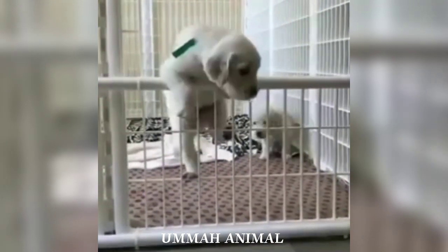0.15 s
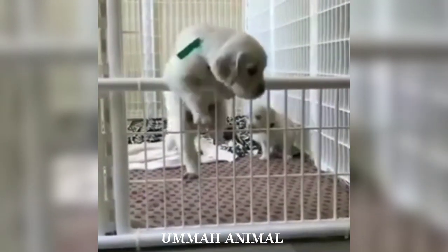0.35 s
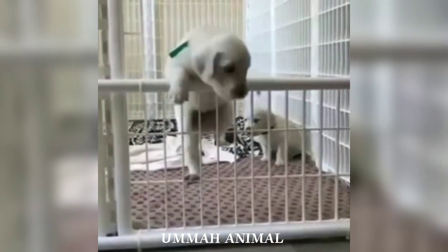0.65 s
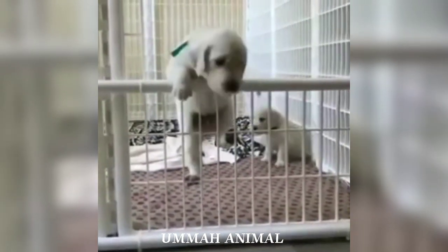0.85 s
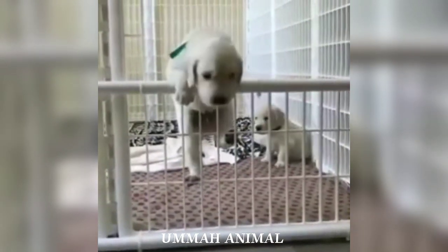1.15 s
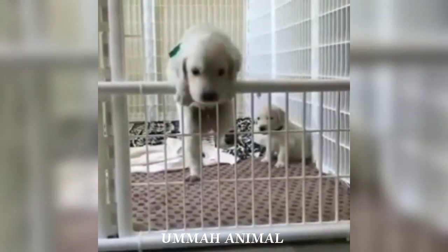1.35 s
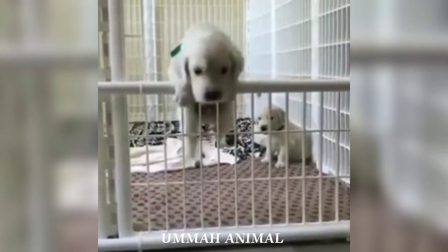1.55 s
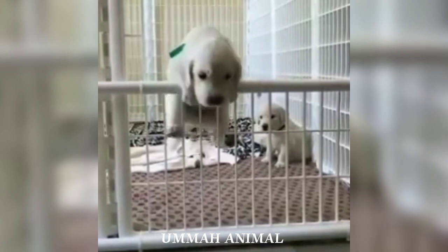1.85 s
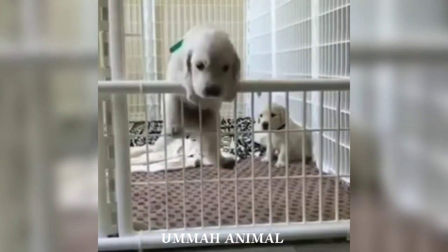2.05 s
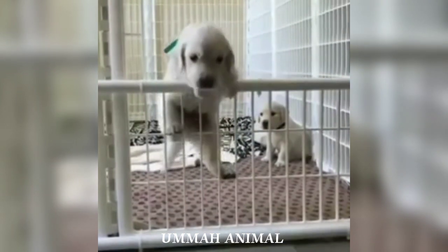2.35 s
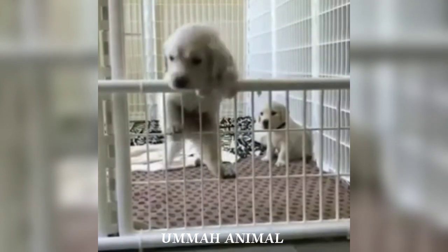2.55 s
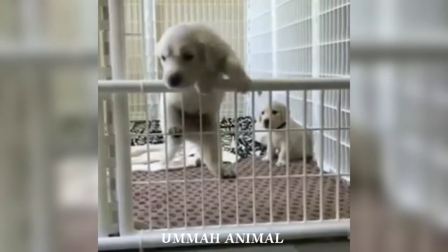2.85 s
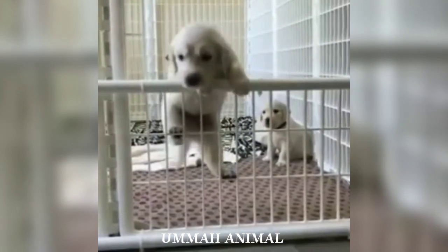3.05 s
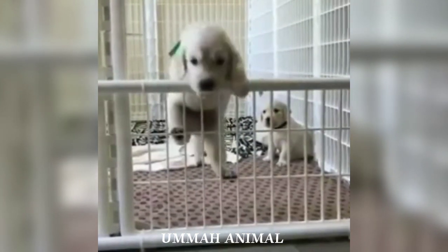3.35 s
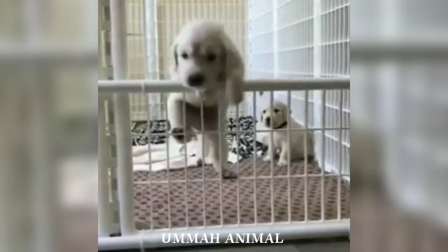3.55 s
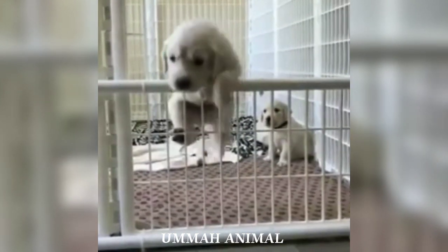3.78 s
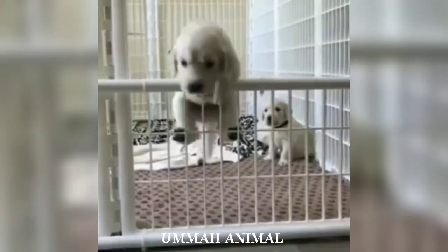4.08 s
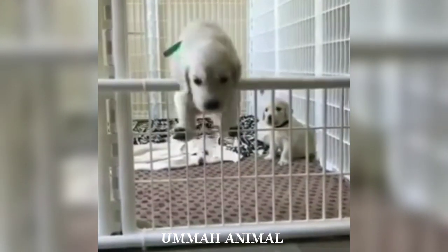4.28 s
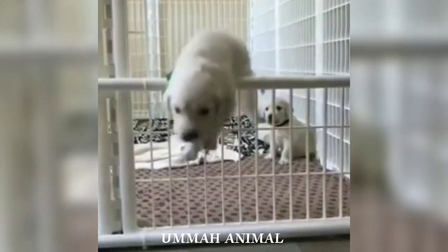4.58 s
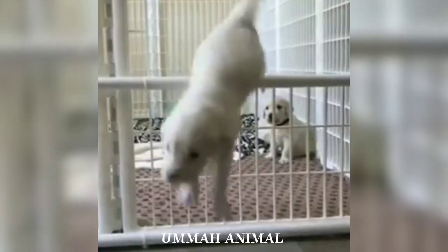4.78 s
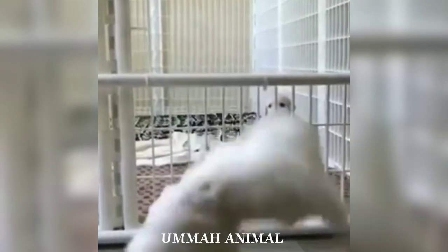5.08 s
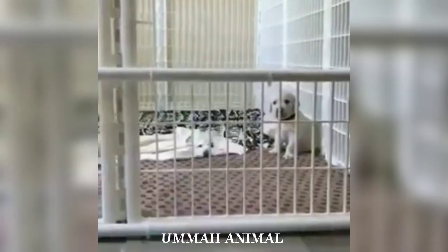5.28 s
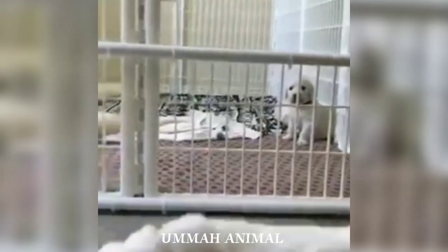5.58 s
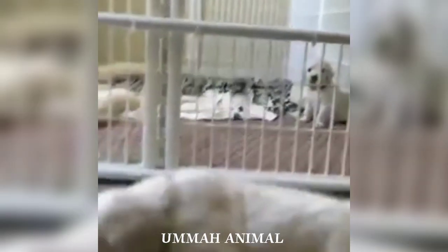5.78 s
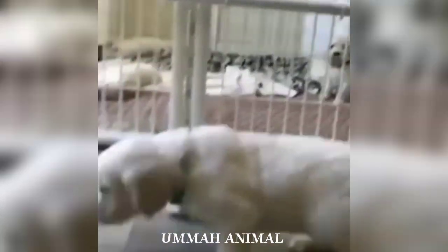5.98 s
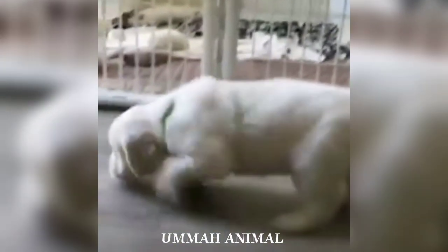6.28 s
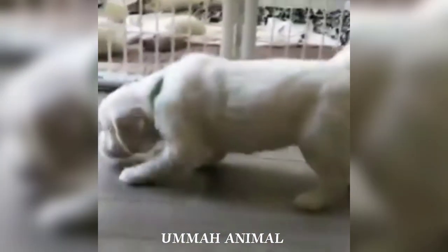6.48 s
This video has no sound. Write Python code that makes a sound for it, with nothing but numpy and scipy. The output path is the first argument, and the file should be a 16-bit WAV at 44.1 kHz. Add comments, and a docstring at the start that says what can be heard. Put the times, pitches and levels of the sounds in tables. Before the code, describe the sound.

A puppy whines in a string of short, high cries, its claws ticking on wire, then lands with one loud knock and scuffs away.

```python
"""A puppy whines over the rail of a wire pen in a small room. Its vocal folds sing short, nearly pure
arches of pitch, and air through its nose adds a hiss and a very high whistle around each one.
Its claws tick on the wire, it drops to the floor with one loud knock among softer bumps, and it
scuffs away on its paws. A low hum and faint room noise lie underneath."""
import sys
import numpy as np
from scipy import signal
from scipy.fft import rfft, irfft
from scipy.io import wavfile
from scipy.ndimage import uniform_filter1d

SR = 44100
rng = np.random.default_rng(int(sys.argv[2]) if len(sys.argv) > 2 else 0)


def waveform_to_disk(signal):
    """Save audio, clipped to [-1, 1], as 16-bit WAV at the path in sys.argv[1]."""
    frames = np.transpose(np.atleast_2d(signal))
    scaled = np.clip(frames, -1, 1) * 32767
    samples = np.round(scaled).astype(np.int16)
    wavfile.write(sys.argv[1], SR, samples)


N = 292383
T = np.arange(N) / SR

# the tones of the hum (frequency [Hz], level [dB])
HUM_TONES = [(49.2, -61), (98.4, -74.5), (120, -70.5)]
# the tone colour of the room noise (frequency [Hz], gain [dB])
ROOM_NOISE_COLOUR = [(15, -22), (25, -15), (54, 0), (80, -25.5), (122, -8.5), (151, -19.5), (208, -17.5),
                     (372, -26.5), (498, -28.5), (966, -31.5), (1360, -31), (1780, -37), (2780, -41),
                     (14000, -48.5)]
# blows of the body on rail and floor
# (time [s], level [dB], base pitch [Hz], swell time [s], crack gain [dB])
BODY_BLOWS = [(.064, -51.5, 480, 0.0018, -13), (2.099, -48.5, 189, 0.0053, -44),
              (5.15, -42, 110, 0.0049, -26), (5.219, -42, 630, .004, -21.5),
              (5.238, -31.5, 480, 0.0006, -19.5), (5.5397, -7.5, 788, 0.0014, -26.5),
              (5.5865, -21, 430, 0.0014, -8.5)]
# the floor panel's ringing tones (frequency [Hz], gain [dB], time to fade by 60 dB [s])
PANEL_TONES = [(606, -13, 0.6), (630, -5, 0.44), (739, 6.5, 0.28), (941, -5, .33), (1020, 10, 0.2),
               (1360, -14.5, 0.54)]
# soft breaths with no voice in them (time [s], length [s], level [dB])
BREATH_PUFFS = [(.135, 0.027, -65.5), (.39, 0.033, -63.5), (.82, 0.079, -67)]
# the tone colour of air through the nose (frequency [Hz], gain [dB])
NOSE_COLOUR = [(500, -9), (2500, -8), (4500, -8), (6700, 1), (9500, -10.5), (12000, -5), (14000, 0.5)]
# a paw meets wire or floor (time [s], tick peak [dB], frame gain [dB], pad slip level [dB])
PAW_STEPS = [(0.185, -51.5, 15, -74), (1.938, -39, -3, -73), (2.043, -47.5, 4, -67),
             (2.257, -34, -2, -53.5), (3.201, -40, -8, -72), (3.849, -44, -28, -76),
             (3.924, -32.5, -10.5, -66.5), (4.046, -41.5, -8, -80), (4.18, -43.5, -3, -60.5),
             (4.237, -32, 15, -54), (4.814, -43, 40, -61), (5.213, -29, -20, -56.5),
             (5.236, -29, 4.5, -64.5), (5.399, -40.5, 5, -50.5), (5.412, -41.5, -12.5, -57.5),
             (5.481, -30.5, -11.5, -52.5), (6.088, -41.5, -8, -81), (6.392, -51, 9.5, -67),
             (6.536, -44.5, -19, -63.5), (6.6, -39.5, -25, -61.5)]
# the bands in which the wire pen rings (frequency [Hz], width [Hz], gain [dB])
PEN_RINGS = [(2526, 280, -9.5), (4300, 240, -2.5), (5480, 160, -5), (6610, 310, -6), (8150, 166, -16),
             (11200, 630, -42.5), (11400, 310, -13.5)]
# slides of the body and paws (time [s], length [s], hiss level [dB], rub compared with hiss [dB])
BODY_SLIDES = [(1.89, 0.053, -61.5, -18), (5.16, 0.035, -64, 7.5), (5.324, 0.017, -50.5, -4),
               (5.507, 0.13, -63, -14), (5.566, 0.044, -45.5, 0.5), (5.632, 0.14, -66, 7.5),
               (5.965, 0.044, -46.5, -16.5), (6.073, 0.071, -63, 2), (6.297, .034, -49.5, -18)]
# the tone colours of a slide's bright hiss and of its dull rub (frequency [Hz], gain [dB])
SLIDE_HISS_COLOUR = [(880, -44), (1500, -19.5), (2330, -14), (4960, -2.5), (5450, -2), (10200, -8.5),
                     (11300, -6), (14000, -12)]
SLIDE_RUB_COLOUR = [(60, -1.5), (180, -11.5), (650, -6.5), (1700, -9.5), (3000, -6.5), (8000, -29.5)]
# one arch of pitch for each whine (start [s], rise [s], fall [s], start pitch [Hz], top pitch [Hz],
# end pitch [Hz], curve of the rise [1 straight, 2 rounded], level [dB], swell during the rise [dB],
# fade time [s], overtone gain [dB], air level [dB], whistle level [dB], air outlasts the voice by [s])
WHINE_ARCHES = [ (0.716, 0.046, .013, 1115, 1213, 1170, 1.22, -40.5, 25, 0.0058, -6, -68.5, -71, 0.058),
                (1.087, .044, 0.049, 1389, 1410, 1127, 2.8, -31, 4.5, 0.044, 2.5, -55.5, -61, 0.058),
                (1.45, 0.023, 0.066, 1330, 1418, 1179, 0.98, -31.5, 7.5, 0.032, 4, -56, -51.5, 0.065),
                (1.77, 0.047, 0.024, 1340, 1471, 1230, 3.04, -28.5, 3, 0.02, -2, -55.5, -55, 0.045),
                (2.087, 0.047, 0.069, 1405, 1503, 1056, 1.7, -28.5, 1.5, 0.033, 0, -53, -60, 0.052),
                (2.386, 0.036, 0.05, 1090, 1390, 1057, 1.3, -32, 0, 0.019, 1.5, -54.5, -54.5, 0.071),
                (2.719, 0.052, 0.027, 1330, 1415, 1047, 2.53, -26.5, 6.5, 0.028, -3, -58, -70, 0.049),
                (2.996, 0.049, 0.05, 1355, 1513, 1110, 1.42, -31, 0, 0.025, -2, -52, -57, 0.055),
                (3.291, 0.065, 0.13, 1470, 1551, 1128, 1.6, -28.5, 4.5, 0.042, -0.5, -50, -55.5, 0.033),
                (3.653, .048, .052, 1040, 1414, 1127, 2, -24.5, 8, 0.046, 2.5, -52.5, -47.5, 0.058),
                (3.994, 0.0032, 0.016, 1020, 980, 873, 1.25, -39.5, 11, 0.015, 12, -57.5, -72, 0.032),
                (4.254, 0.04, 0.021, 990, 1209, 986, 0.32, -34, 1, 0.02, -2, -58, -66, 0.1),
                (4.577, 0.051, 0.012, 956, 1300, 1094, 0.89, -29.5, 4, 0.021, 2, -50.5, -59, 0.04),
                (5.107, 0.035, 0.017, 825, 845, 774, 0.94, -46, 5, .006, 21.5, -57.5, -76, 0.02)]
# the tone colour of the whines: a strong low tone, faint overtones, a little brightness near 4.5 kHz
# (frequency [Hz], gain [dB])
WHINE_COLOUR = [(800, 11), (1400, 0), (1650, -9), (1850, -32), (2150, -20), (2800, -41.5), (3500, -36),
                (4200, -24.5), (4600, -21.5), (5100, -36), (5800, -30), (7100, -32), (8600, -44),
                (10000, -51.5), (13000, -46)]
# a ring of the nose that comes in as the mouth closes (frequency [Hz], gain [dB])
CLOSED_MOUTH_COLOUR = [(8000, -52), (10500, -26), (11800, -17.5), (12700, -28), (14000, -60)]

HOARSE_BELOW_HZ = 1500  # below this pitch the vocal folds are slack and swing less evenly


def undb(db):
    """Turn decibels into a number to multiply by."""
    return 10 ** (np.asarray(db) / 20)


def unit(x):
    """Scale a sound to an average strength (rms) of 1."""
    return x / np.sqrt(np.mean(x ** 2))


def gain_at(colour, hz):
    """Look up a tone colour's gain at any frequency."""
    known_hz, db = np.transpose(colour)
    return undb(np.interp(np.log(hz + 1), np.log(known_hz), db))


def noise(colour):
    """Noise of strength 1 with the given tone colour."""
    hz = np.arange(N // 2 + 1) * SR / N
    return unit(irfft(rfft(rng.standard_normal(N)) * gain_at(colour, hz), N))


def resonate(x, hz, width_hz):
    """Let a sound ring in one band of frequencies."""
    return signal.lfilter(*signal.iirpeak(hz, hz / width_hz, SR), x)


def waver(rate_hz):
    """Smooth random movement of strength 1."""
    size = int(SR / rate_hz)
    return unit(uniform_filter1d(uniform_filter1d(rng.standard_normal(N), size), size))


def swells(rows, t=T):
    """Bell-shaped rises in loudness from rows of (time [s], length [s], level [dB])."""
    return np.sqrt(sum(undb(db) ** 2 * np.exp(-np.pi * ((t - s) / length) ** 2)
                       for s, length, db in rows))


def add(track, s, x):
    """Mix x into the track, starting s seconds in."""
    i = int(s * SR)
    track[i:i + len(x)] += x[:N - i]


def background(hiss_db=-65.5):
    """A steady low hum over faint room noise."""
    hum = sum(np.sqrt(2) * undb(db) * np.sin(2 * np.pi * (hz * T + rng.random())) for hz, db in HUM_TONES)
    hiss = signal.sosfilt(signal.butter(4, 75, "high", fs=SR, output="sos"), noise(ROOM_NOISE_COLOUR))
    return hum + undb(hiss_db) * unit(hiss) * undb(0.11 * waver(7.2))


def knocks(crack_s=0.005, panel_db=-36, boom_hz=128, boom_swell_s=0.0057, boom_db=-28.5):
    """The body hits with a thud and a crack; the floor gives with a low boom and its panel rings on."""
    out, t = np.zeros(N), T[:SR // 2]
    panel = sum(undb(db - 60 * t / fade_s) * np.sin(2 * np.pi * hz * t) for hz, db, fade_s in PANEL_TONES)
    boom = (t / boom_swell_s * np.exp(1 - t / boom_swell_s)) ** 2 * np.sin(2 * np.pi * boom_hz * t)
    for s, db, base_hz, swell_s, crack_db in BODY_BLOWS:
        age = t / swell_s
        pitch = base_hz * (.9 + .6 * np.exp(-age / .7))  # sags as the weight settles
        phase = 2 * np.pi * np.cumsum(pitch) / SR
        loudness = (age * np.exp(1 - age)) ** 2
        thud = loudness * (np.sin(phase) + undb(-18) * np.sin(phase / 2))
        crack = undb(crack_db) * np.exp(-t / crack_s) * rng.standard_normal(len(t)) / 2
        add(out, s, undb(db) * (thud + crack + undb(boom_db) * boom + undb(panel_db) * panel))
    return out


def nose(phase, loudness, lead_s=0.015, puff_hz=13700, arch_hz=(13400, 14900, 14300, 12500)):
    """Air hisses through the nose and blows a thin, broken whistle, in puffs and around each whine."""
    air = swells(BREATH_PUFFS)
    wobble = 1 + .007 * waver(500) + .012 * waver(40)
    flicker = undb(5 * waver(110))
    whistle = undb(-1) * air * np.sin(2 * np.pi * np.cumsum(puff_hz * wobble) / SR)
    for start, rise_s, fall_s, *_, air_db, whistle_db, lag_s in WHINE_ARCHES:
        end = start + rise_s + fall_s
        span = (T > start - lead_s) & (T < end + lag_s)
        t = T[span]
        progress = (t - t[0]) / (t[-1] - t[0])
        air[span] += undb(air_db) * np.abs(np.sin(np.pi * progress ** 0.88)) ** 0.83
        # the whistle sounds three times: on the way up, as the voice sags, and in a last falling squeak
        bursts = swells([(start - lead_s / 2, lead_s / 2, -8), (end - lead_s, 0.61 * lead_s, 0),
                         (end + 0.6 * lag_s, lag_s / 4, -2)], t)
        hz = np.interp(t, [start - lead_s, start + lead_s, end - lead_s / 2, end + lag_s], arch_hz)
        whistle[span] += undb(whistle_db) * bursts * np.sin(2 * np.pi * np.cumsum(hz * wobble[span]) / SR)
    # while the vocal folds swing, they chop the whistle into extra tones and let less air past
    depth = 0.99 * np.tanh(loudness / undb(-72))
    chop = 1 + depth * (np.cos(phase) + 2 * np.cos(2 * phase) + np.cos(3 * phase))
    air *= undb(-3 * np.tanh(loudness / undb(-41.5)))
    return whistle * flicker * chop + air * noise(NOSE_COLOUR) * undb(waver(100))


def claw_ticks(tick_s=.0022, rattle_s=0.0076, rattle_db=-14, crack_db=-10, frame_hz=1500):
    """A claw strikes the wire: a sharp tap and a brief rattle ring the pen and its duller frame."""
    out, t = np.zeros(N), T[:4096]
    for s, db, frame_db, _ in PAW_STEPS:
        fade = np.exp(-t / tick_s) + undb(rattle_db) * np.exp(-t / rattle_s)
        push = rng.standard_normal(len(t)) * fade * (1 - np.exp(-t / .0004))
        wire = sum(undb(gain) * resonate(push, hz, width) for hz, width, gain in PEN_RINGS)
        frame = resonate(resonate(push, frame_hz, width_hz=1100), frame_hz, width_hz=1100)
        tick = unit(wire + undb(crack_db) * push) + undb(frame_db - 2) * unit(frame)
        add(out, s, undb(db) * tick / np.abs(tick).max())
    return out


def scuffs(slip_lag_s=0.012, slip_s=0.023, pad_rub_db=0.5):
    """Pads and fur drag over the floor in small uneven slips; weight on them adds a dull rub."""
    # each pad slips just after its claw lands
    pads = [(s + slip_lag_s, slip_s, slip_db, pad_rub_db) for s, _, _, slip_db in PAW_STEPS]
    s, length, db, rub_db = np.transpose(BODY_SLIDES + pads)
    slips = undb(3.5 * waver(400))
    hiss = swells(zip(s, length, db)) * unit(noise(SLIDE_HISS_COLOUR) * slips)
    rub = swells(zip(s, length, db + rub_db)) * unit(noise(SLIDE_RUB_COLOUR) * slips)
    return hiss + rub


def voice_box(edge_s=.008, fade_db=20, smooth_s=0.00097):
    """Pitch, loudness and mouth closing: a whine swells as it climbs and fades as it drops."""
    pitch, loudness, closing = np.ones(N) * HOARSE_BELOW_HZ, np.zeros(N), np.zeros(N)
    for start, rise_s, fall_s, start_hz, top_hz, end_hz, curve, db, swell_db, fade_s, *_ in WHINE_ARCHES:
        span = T > start - .05
        t = T[span] - start
        climb_left = np.clip(1 - t / rise_s, 0, 1)
        fall = np.clip((t - rise_s) / fall_s, 0, 1)
        # the pitch leaves its top slowly, then drops ever faster
        pitch[span] = top_hz + (start_hz - top_hz) * climb_left ** curve + (end_hz - top_hz) * fall ** 1.4
        left_s = rise_s + fall_s - t
        sounding = np.clip(np.minimum(t, left_s) / edge_s, 0, 1)
        fade = np.clip(1 - left_s / fade_s, 0, 1)
        loudness[span] = sounding * undb(db - swell_db * climb_left ** 2 - fade_db * fade)
        closing[span] = fall
    return pitch, uniform_filter1d(loudness, int(smooth_s * SR) + 1), closing


def voice(phase, pitch, loudness, closing):
    """The vocal folds make a clean tone with weak, drifting overtones, and chop the air into a rasp."""
    starts, *_, overtone_db, _, _, _ = np.transpose(WHINE_ARCHES)
    which_whine = np.clip(np.searchsorted(starts, T + .05) - 1, 0, None)
    # the folds close more softly as a whine fades, so its overtones die first
    brightness = undb(overtone_db[which_whine]) * np.abs(loudness / undb(-43.5)) ** 0.3
    overtones = 0
    for k in range(2, 12):
        drift = undb(2.8 * waver(110) + 3.5 * waver(25))
        colour = gain_at(WHINE_COLOUR, k * pitch) + closing * gain_at(CLOSED_MOUTH_COLOUR, k * pitch)
        overtones += colour * drift * np.sin(k * phase + 0.27 * np.sqrt(k) * waver(240))
    tone = np.sqrt(2) * (np.sin(phase) + undb(-4) * brightness * overtones / gain_at(WHINE_COLOUR, pitch))
    rasp = undb(-39) * brightness * noise(NOSE_COLOUR) * (1 + np.cos(phase))
    return loudness * (tone + rasp)


def puppy():
    """Voice and nose follow one slightly unsteady pitch, which is hoarser when it is low."""
    pitch, loudness, closing = voice_box()
    hoarseness = np.maximum(HOARSE_BELOW_HZ / pitch, 1) ** 3
    wobble = 1 + 0.0045 * hoarseness * waver(300) + 0.007 * waver(70)
    phase = 2 * np.pi * np.cumsum(pitch * wobble) / SR
    tremble = undb(2.1 * waver(50))
    return voice(phase, pitch, loudness * tremble, closing) + nose(phase, loudness)


def room(x, fade_s, treble_fade_s, gap_s):
    """The room's wash of echoes: it drops 60 dB in fade_s seconds, and its treble dies sooner."""
    t = T[:SR]
    reflections = rng.standard_normal(SR)
    low = signal.sosfiltfilt(signal.butter(3, 5500, fs=SR, output="sos"), reflections)
    slow, fast = (undb(-60 * t / s) * (t > gap_s) for s in (fade_s, treble_fade_s))
    tail = low * slow + (reflections - low) * fast
    return signal.fftconvolve(x, tail / np.linalg.norm(slow))[:N]


def scene(wall_delay_s=0.065, wall_db=-25):
    """Puppy, pen and floor, heard directly and through the room; a far wall returns the whines once."""
    dog, claws, thuds, paws = puppy(), claw_ticks(), knocks(), scuffs()
    # the whines' room echo starts after a short gap, keeping them clear; the other sounds echo at once
    echo = room(undb(-12.5) * dog, fade_s=0.66, treble_fade_s=0.29, gap_s=.016)
    add(echo, wall_delay_s, undb(wall_db) * dog)
    contacts = undb(-7) * claws + undb(-4) * thuds + undb(-10) * paws
    echo += room(contacts, fade_s=0.53, treble_fade_s=0.45, gap_s=0.0015)
    return (dog + claws + thuds + paws + echo + background())[None]


def record(dry, top_hz=14000):
    """A steep filter cuts off the very highest treble."""
    return signal.sosfilt(signal.ellip(10, .2, 70, top_hz, fs=SR, output="sos"), dry)


dry = scene()
out = record(dry)
waveform_to_disk(out)
```